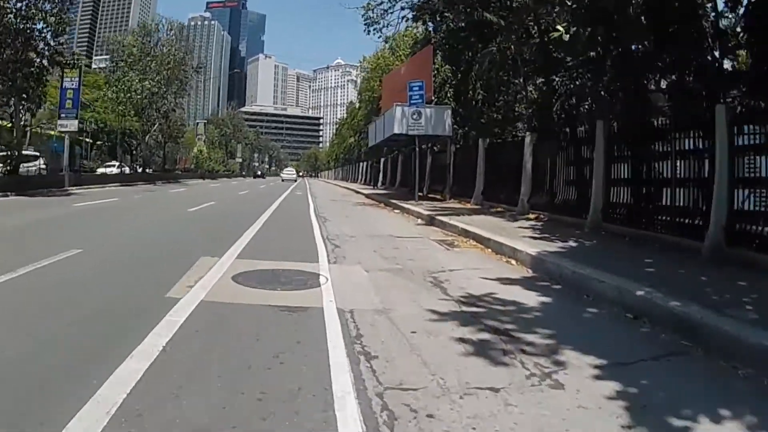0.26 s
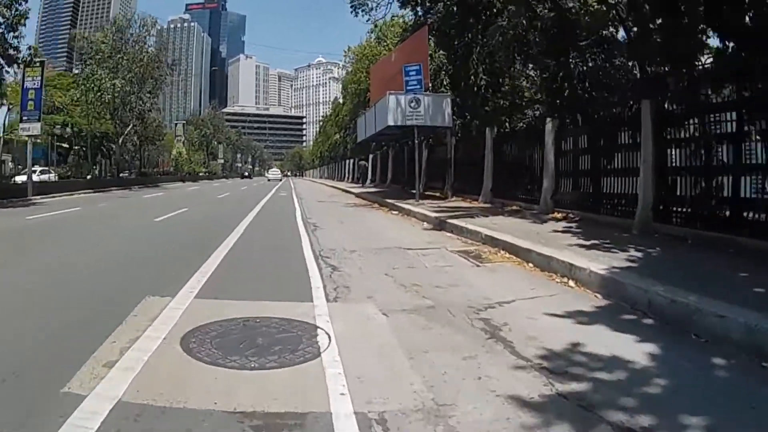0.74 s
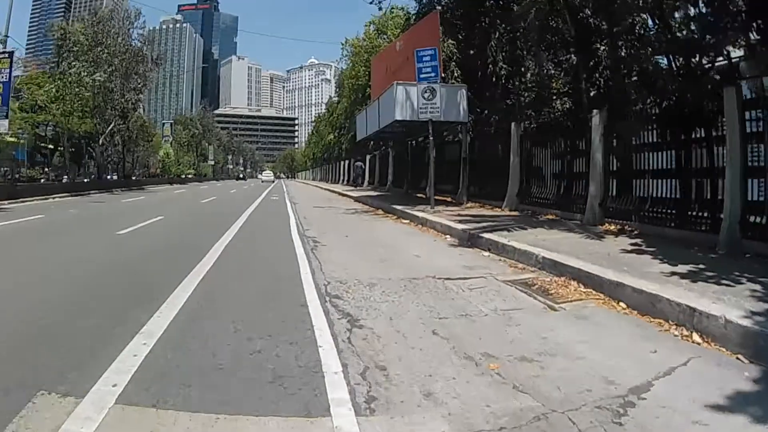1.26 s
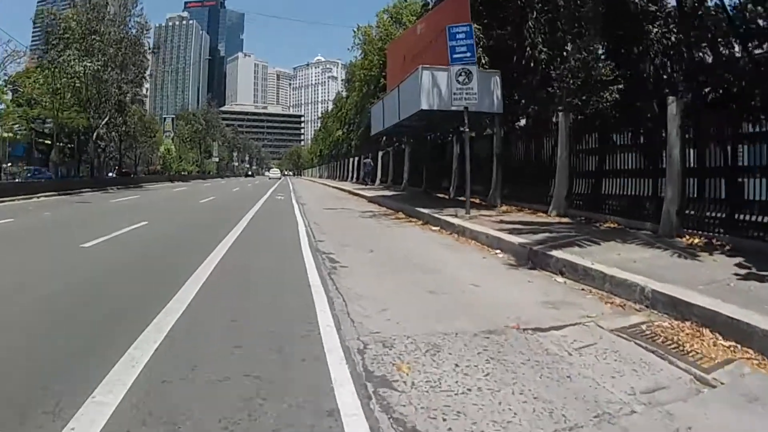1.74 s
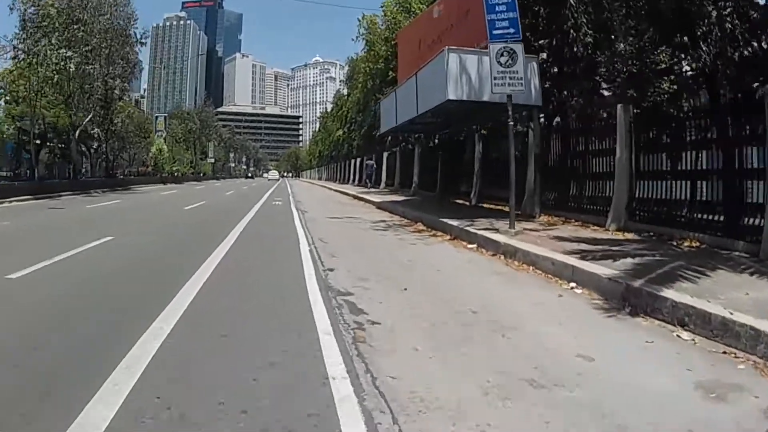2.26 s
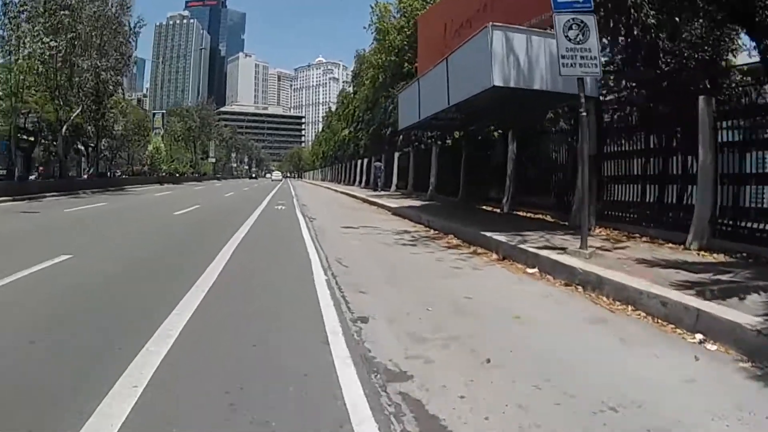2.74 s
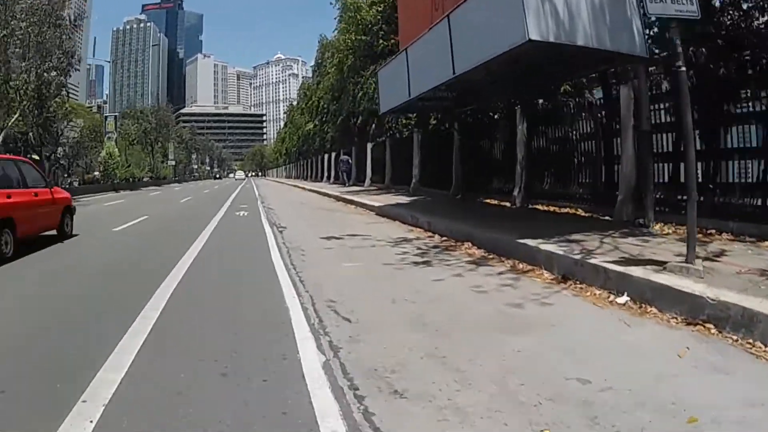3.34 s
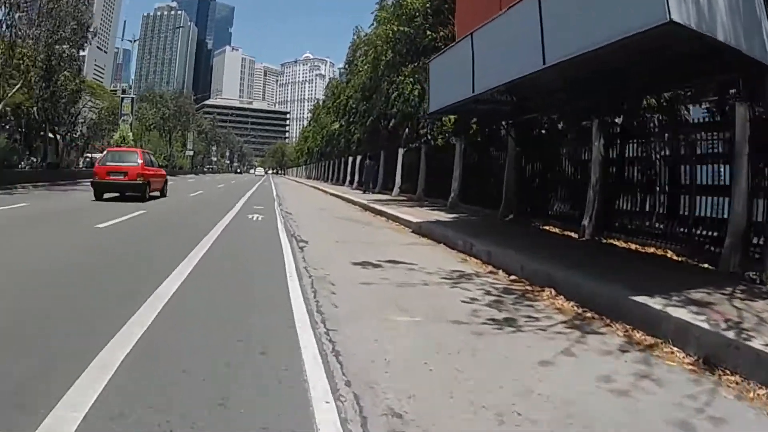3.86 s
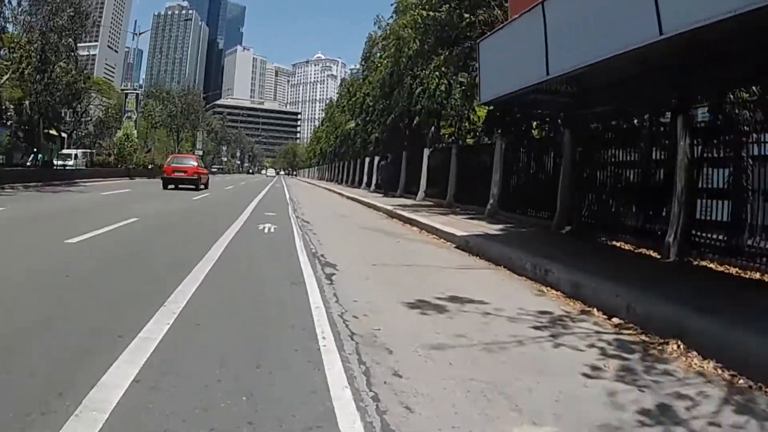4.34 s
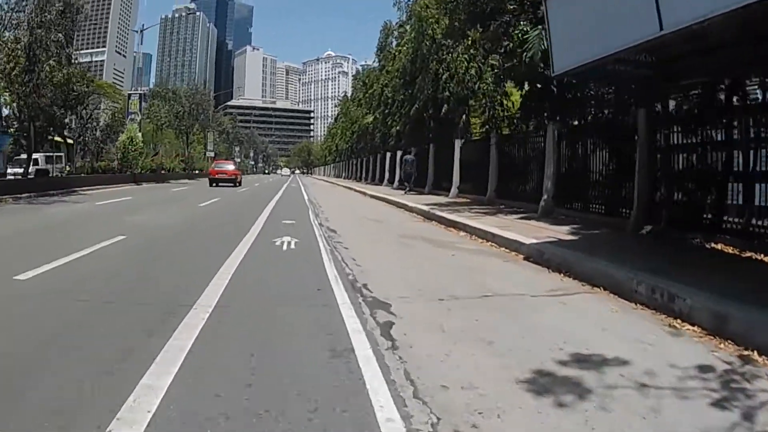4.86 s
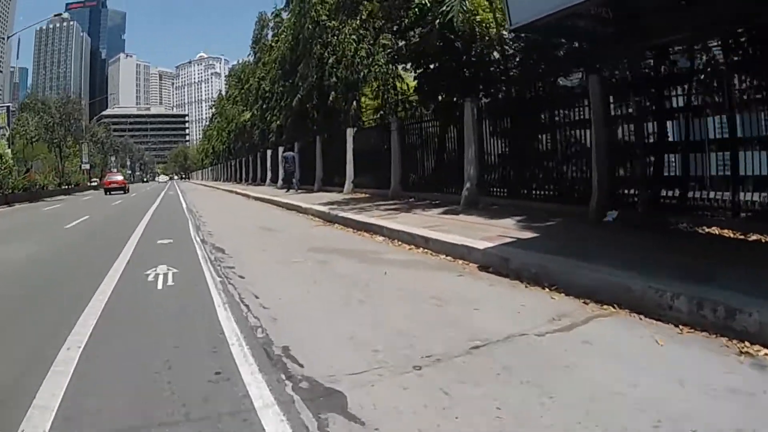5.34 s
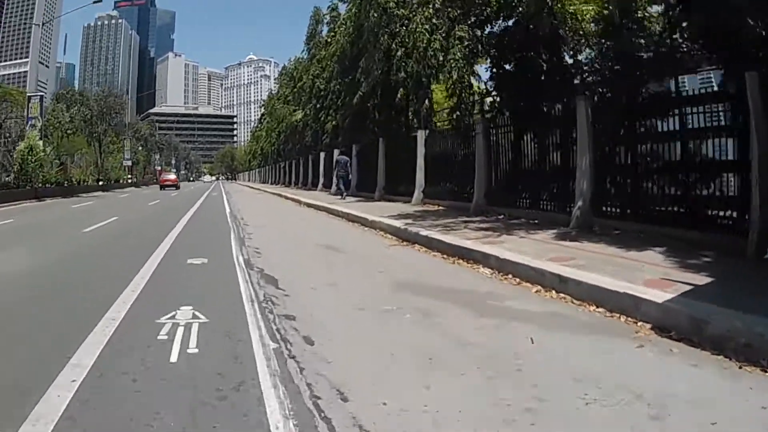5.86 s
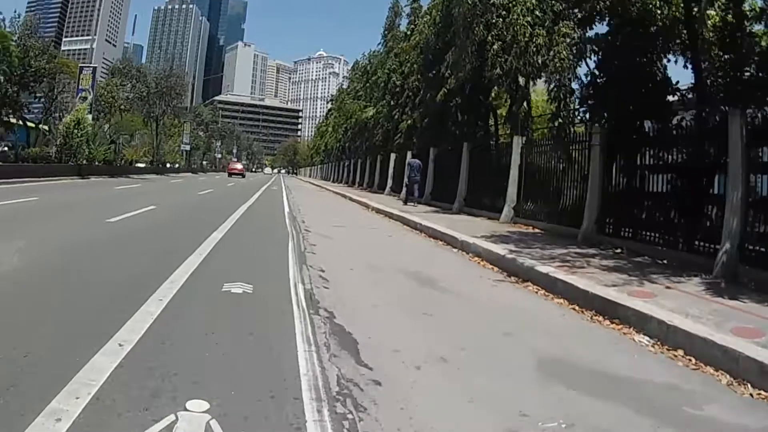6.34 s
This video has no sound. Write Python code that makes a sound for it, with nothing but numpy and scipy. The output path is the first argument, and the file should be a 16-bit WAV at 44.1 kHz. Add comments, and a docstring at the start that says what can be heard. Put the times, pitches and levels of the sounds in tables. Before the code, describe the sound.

A bicycle rolls along a rough city street, heard dry and close from a microphone in a plastic housing on the handlebar. Deep, lumpy wind sways and flutters throughout, above a low mount drone and gritty, hollow tyre roar. The road noise is strong for the first 1.3 s; a small knock at 1.3 and a cluster of dry ticks from 1.45 to 1.95 follow as it drops, quietest around 1.7-2.5. It builds again from 3, with light clacks and a faint car hiss swelling near 3.5. A very hard clack with a crack lands at 3.94, another with a bright ping at 4.17. A bump rattles in a quick run at 4.5-4.65. A modest clack comes at 5.4, sharp ones at 5.95 and 6.15, then the hardest, clipping double jolt at 6.4-6.5, rumble continuing to the end.

```python
"""A bicycle rolls along a city street, heard by a microphone in a plastic housing on the handlebar.
Noise and grit for the rough asphalt drive the resonances of mount and housing, over a deep, lumpy
sway and flutter of air. Knocks and snaps through the same resonances make clacks on small bumps and
rattles over two big ones, the hardest clipping. Dry ticks and cracks, sine pings and the faint
filtered hiss of an overtaking car complete it."""
import sys
import numpy as np
from scipy import signal
from scipy.fft import rfft, irfft
from scipy.io import wavfile
from scipy.ndimage import uniform_filter1d, minimum_filter1d

SR = 44100
rng = np.random.default_rng(int(sys.argv[2]) if len(sys.argv) > 2 else 0)


def dump(signal):
    """Clip the signal to [-1, 1] and save it as 16-bit WAV at the path in sys.argv[1]."""
    limited = np.clip(np.atleast_2d(signal).T, -1, 1)
    pcm = np.round(limited * 32767).astype(np.int16)
    wavfile.write(sys.argv[1], SR, pcm)


N = 291060
TIME, HZ = np.arange(N) / SR, np.fft.rfftfreq(N, 1 / SR)  # seconds, and the frequency of each bin
EDGE_HZ = 15800  # upper edge of the recorder's band

# Levels are in dB; some layers add a trim of their own.
# shaking by the road: start_s [s], mount_db [dB], housing_db [dB], treble_db [dB]
ROAD_SHAKING = [(0, -20.5, -33, -60.5), (0.33, -24, -34, -62.5), (0.851, -21, -32.5, -60.5),
                (1.271, -22.5, -35, -61.5), (1.37, -29.5, -42, -69), (1.52, -32.5, -41.5, -63),
                (1.7, -40.5, -52.5, -68.5), (2.25, -35, -44.5, -73), (2.95, -29.5, -40.5, -64),
                (3.148, -26, -37.5, -61), (3.701, -22.5, -33, -66.5), (4.05, -28.5, -39, -70.5),
                (4.45, -25.5, -35.5, -61.5), (4.799, -31, -42.5, -69), (5.2, -25.5, -37, -60.5),
                (5.88, -22.5, -33.5, -61), (6.2, -24.5, -40, -68), (6.6, -25.5, -37, -59)]
# tone of tyre on asphalt: frequency_hz [Hz], level_db [dB]
ROAD_TONE = [(500, 7), (1200, -1.5), (1500, -3), (1850, -5.5), (2150, -10.5), (2850, -17), (3300, -20),
             (4000, -18.5), (6000, -29), (12000, -45)]
# resonances of handlebar and mount: pitch_hz [Hz], width_hz [Hz], level_db [dB]
MOUNT_MODES = [(98, 58, -8.5), (133.7, 46.4, 1.5), (226.5, 54, -0.5), (295.9, 59, 0), (355.7, 34, -8),
               (383, 64.5, -11)]
# resonances of the plastic housing: pitch_hz [Hz], width_hz [Hz], level_db [dB]
HOUSING_MODES = [(490, 180, -16.5), (779, 113, -5), (892.6, 70, 0.5), (1021, 150, 0), (1155, 120, -0.5),
                 (1224, 55, 3), (1299.4, 128, 1), (1643, 160, -14), (1887, 190, -8), (2260, 460, -20),
                 (2520, 99, -15), (2870, 330, -16), (3194, 120, -14.5), (3376, 210, -16.5),
                 (3830, 740, -24), (4020, 100, -21.5), (4800, 390, -24.5), (6200, 450, -41),
                 (6900, 630, -46)]
# light parts ringing in short blips: pitch_hz [Hz], width_hz [Hz], level_db [dB]
BLIP_MODES = [(1838, 92, 0.5), (2834, 210, -17.5), (3660, 220, -29.5)]
# how loudly those light parts ring: start_s [s], level_db [dB]
BLIP_LEVEL = [(0, -50), (0.2, -49.5), (0.5, -47), (0.9, -43.5), (1.25, -50), (1.7, -61), (2.1, -62.5),
              (2.6, -49.5), (3.0, -53), (3.6, -41), (3.85, -51.5), (4.4, -52.5), (4.8, -60), (5.5, -50.5),
              (6.1, -56), (6.25, -57.5), (6.6, -54.5)]
# tone of the deep sway: frequency_hz [Hz], level_db [dB per Hz]
SWAY_TONE = [(8, 1.5), (17, -16.5), (24, 7), (31, 7), (40, -4), (52, -15), (80, -44.5)]
# tone of the air flutter above it: frequency_hz [Hz], level_db [dB per Hz]
FLUTTER_TONE = [(25, -29), (50, 5.5), (75, -1.5), (110, -7.5), (170, -20), (400, -35), (1500, -63.5),
                (6000, -75), (14000, -97.5)]
# slow swell of the deep buffeting: start_s [s], level_db [dB]
WIND_SWELL = [(0, -9), (0.6, -13.5), (1.0, -13), (1.8, -15.5), (2.25, -17.5), (2.6, -14.5), (2.9, -17.5),
              (3.3, -17), (3.7, -16.5), (4.2, -13), (4.6, -14.5), (5.0, -19), (5.3, -18.5), (5.6, -10.5),
              (6.2, -13.5), (6.6, -8.5)]
# heavy gusts standing out of it: middle_s [s], length_s [s], sway_db [dB], flutter_db [dB]
GUST_ARCHES = [(0.463, 0.12, -3, -40), (1.159, 0.065, -2, -37.5), (1.278, 0.11, 0, -19),
               (1.542, 0.3, -6, -16.5), (1.821, 0.071, -8, -24), (1.93, 0.16, -8.5, -26),
               (3.57, 0.093, -7.5, -23), (3.763, 0.089, -3.5, -26), (3.906, 0.12, -5.5, -18.5),
               (4.691, 0.15, -5, -24)]
# tone of the passing car: frequency_hz [Hz], level_db [dB per Hz]
CAR_TONE = [(100, -8), (500, -8), (1000, 7.5), (1600, -4.5), (2300, -15.5), (3400, -19), (4000, -24.5),
            (5000, -32.5), (16000, -65)]
# tone of the steady background hiss: frequency_hz [Hz], level_db [dB per Hz]
HISS_TONE = [(1000, -5.5), (5000, -3.5), (8000, -7.5), (12000, -19.5), (16000, -24.5)]
# clearest pings of the light parts: start_s [s], peak_db [dB], pitch_hz [Hz]
PING_HITS = [(0.062, -45, 2830), (0.233, -31.5, 1860), (0.696, -51.5, 2920), (2.006, -41.5, 1850),
             (2.088, -53, 2880), (3.485, -47.5, 2830), (3.6, -40, 2850), (3.666, -32, 1807),
             (4.05, -33, 1810), (4.17, -13, 1820), (4.277, -53, 2900), (4.364, -43.5, 2830),
             (6.062, -49, 2830)]
# dry ticks, most of them where the air buffets hardest: start_s [s], level_db [dB]
TICK_HITS = [(0.4775, -35), (0.8315, -28.5), (1.149, -33), (1.1735, -26.5), (1.3038, -14.5), (1.309, -33),
             (1.4585, -30), (1.4705, -19), (1.473, -32), (1.52, -33), (1.5367, -28), (1.5402, -18.5),
             (1.5599, -13.5), (1.579, -30), (1.5855, -24), (1.623, -25), (1.63, -34), (1.6403, -15),
             (1.651, -29), (1.695, -31.5), (1.711, -33), (1.731, -33.5), (1.816, -28.5), (1.826, -29),
             (1.9115, -22), (1.9215, -24), (1.9468, -20.5), (1.952, -25), (1.962, -28), (2.107, -36.5),
             (2.464, -37), (2.609, -28), (2.639, -33), (3.548, -32), (3.9302, -19), (4.671, -25),
             (4.6928, -16), (4.70, -28), (4.723, -29), (4.728, -40), (4.733, -31.5), (5.762, -20),
             (6.5365, -19.5), (6.541, -26), (6.546, -30)]
# tone of a dry tick: frequency_hz [Hz], level_db [dB]
TICK_TONE = [(60, 10.5), (300, 15), (1000, 6.5), (3000, -6), (7000, -14.5), (10000, -23.5), (12000, -33),
             (16000, -33)]
# thin cracks, most of them on hard blows, a few among the dry ticks: start_s [s], level_db [dB]
CRACK_HITS = [(1.2925, -22), (1.537, -25), (1.56, -36), (3.9383, -3.5), (4.546, -29.5), (4.5523, -30),
              (4.5715, -36), (4.5945, -38), (4.6712, -25), (5.9515, -7.5), (6.1487, -13), (6.3953, -11),
              (6.4365, -7), (6.4445, -27), (6.4487, -5), (6.472, -16.5)]
# tone of a thin crack: frequency_hz [Hz], level_db [dB]
CRACK_TONE = [(500, -6.5), (2000, 15), (5000, 2.5), (7000, 3), (10000, 4.5), (13000, -10.5), (16000, -14.5)]
# clacks of the housing: start_s [s], level_db [dB], treble_share_db [dB], pitch_hz [Hz]
CLACK_HITS = [(0.53, -29, -9, 1140), (0.917, -26, -12.5, 1110), (1.291, -19.5, -3, 1180),
              (1.4675, -19, -13, 1100), (1.471, -14, -16.5, 1000), (2.197, -22.5, -10.5, 1040),
              (2.703, -37, -7, 1104), (2.784, -22.5, -17.5, 1000), (3.076, -26, -18.5, 886),
              (3.167, -19, -13.5, 1010), (3.376, -31.5, -9, 1080), (3.5408, -17, -23, 930),
              (3.659, -14.5, -24.5, 1040), (3.876, -24, -11, 1070), (3.9351, 3.5, -6.5, 990),
              (3.942, -22, -17, 1150), (4.1705, -4, -5, 1237), (4.1761, -6.5, -24, 1196),
              (4.181, -15.5, -8, 1350), (4.852, -31, -25, 1060), (5.396, -14.5, -11.5, 1170),
              (5.455, -24, -9, 1250), (5.563, -27.5, -23.5, 970), (5.912, -21.5, -29.5, 1050),
              (5.9496, 1, -7.5, 1350), (5.954, -13.5, -12, 1250), (6.146, -4, -7, 1200),
              (6.153, -7.5, -17, 1200), (6.159, -11.5, -18, 1100)]
# tone of a light, hard contact: frequency_hz [Hz], level_db [dB]
CLACK_TONE = [(300, 11), (550, 4.5), (760, 3.5), (1100, 8), (1400, 4), (1850, 7), (2400, 1.5), (2900, 5.5),
              (3400, 3.5), (3950, 8), (4700, 0.5), (6300, -2)]
# single blows of the jolts: start_s [s], level_db [dB], treble_share_db [dB], thud_share_db [dB], pitch_hz [Hz]
JOLT_HITS = [(1.283, -21.5, -14, 6.5, 1120), (4.508, -10, -29, -4.5, 1160), (4.515, -7.5, -20, 1, 1150),
             (4.527, -18.5, -23, 6.5, 1170), (4.543, -4, -17, 1.5, 1130), (4.551, -3, -31, -0.5, 1060),
             (4.5695, 0.5, -19, -4, 1110), (4.576, -5, -23, -0.5, 940), (4.586, -13, -25, 4, 1100),
             (4.594, -13.5, -22, 4, 1080), (4.606, -16.5, -23, -6, 1150), (4.634, -21.5, -20, 6, 1190),
             (4.652, -22, -20, -4, 1040), (5.397, -29, -29, 12, 1090), (6.3942, 0.5, -19, -7, 1120),
             (6.399, -4.5, -14, 0.5, 1700), (6.404, -7.5, -14, 0, 1280), (6.42, -14, -16, 0, 1100),
             (6.436, 5.5, -15, -5, 1250), (6.441, 2, -28, -5, 1300), (6.449, -8.5, -8, 4, 1100),
             (6.457, -8, -8, 9, 900), (6.464, -11, -12, 4, 1200), (6.475, -20, -24, -7, 1200),
             (6.482, -17, -24, -4, 1150), (6.496, -15.5, -27, 4, 1100), (6.505, -19.5, -26, 11, 1100),
             (6.518, -22, -21, -3, 1200)]
# tone of a broad, heavy blow: frequency_hz [Hz], level_db [dB]
JOLT_TONE = [(100, -15.5), (200, -3), (290, 5.5), (400, 1), (620, 14.5), (850, 0.5), (1250, 1), (1550, 7),
             (1850, 5.5), (2300, 3.5), (3200, -13), (4200, -10.5), (4900, -15), (8000, -11)]


def gain_of(db):
    """Decibels to amplitude."""
    return 10 ** (np.asarray(db) / 20)


def evened(x):
    """Scales to rms 1."""
    return x / np.sqrt(np.mean(x ** 2) + 1e-20)


def peaked(x):
    """Scales to peak 1."""
    return x / (abs(x).max() + 1e-12)


def noise():
    """White noise over the whole scene."""
    return rng.standard_normal(N)


def add(mix, start_s, sound):
    """Mixes a sound in at its start time."""
    part = mix[max(round(start_s * SR), 0):][:len(sound)]
    part += sound[:len(part)]


def over_time(points):
    """Level in dB at every moment, from a few (s, dB) points."""
    return np.interp(TIME, *np.transpose(points))


def below(split_hz, steepness):
    """Gain at every frequency of a smooth low-pass."""
    return 1 / (1 + (HZ / split_hz) ** steepness)


def colour(points):
    """Gain at every frequency from a few (Hz, dB) points."""
    hz, db = np.transpose(points)
    return gain_of(np.interp(np.log(HZ + 1), np.log(hz), db))


def body(modes):
    """Gain at every frequency of a set of steep-sided resonances, summed as power."""
    power = 0
    for hz, width_hz, db in modes:
        power = power + (gain_of(db) / (1 + (2 * (HZ - hz) / width_hz) ** 2)) ** 2
    return np.sqrt(power)


def shaped(x, gain):
    """Filters a whole signal; rms 1."""
    return evened(irfft(rfft(x) * gain, N))


def ring(gain, size=4096):
    """Causal impulse response with the given gain: the energy comes as early as it can."""
    log_gain = np.log(np.maximum(gain / gain.max(), 1e-5))
    circle = np.concatenate([log_gain, log_gain[-2:0:-1]])
    # minimum phase follows from the Hilbert transform of the log gain
    return np.fft.ifft(np.exp(np.conj(signal.hilbert(circle)))).real[:size]


def wander(rate_hz):
    """Slow random drift of rms 1."""
    return shaped(noise(), below(rate_hz, 4))


def stones(per_s, spread_db):
    """Random kicks of uneven size and either sign, from the grain of the asphalt."""
    size = gain_of(spread_db * np.minimum(rng.exponential(1, N), 3))
    return (rng.random(N) < per_s / SR) * size * rng.choice([-1, 1], N)


def blipping(per_s=87, spread_db=3.0):
    """Stones kick light parts, each ringing in short blips at its own resonance."""
    blips = np.zeros(N)
    for hz, width_hz, db in BLIP_MODES:
        part_ring = ring(body([(hz, width_hz, 0)]))
        blips += gain_of(db) * evened(signal.fftconvolve(stones(per_s, spread_db), part_ring)[:N])
    return gain_of(over_time(BLIP_LEVEL)) * blips


def rolling(mount_db=1.5, housing_db=-0.5, treble_db=-2.0, patchy_db=1.91, grit_db=-11,
            treble_grit_db=-3, split_hz=2150):
    """Asphalt shakes mount and housing; stones stand out as grit, most in the treble, and as blips."""
    start_s, *columns = np.transpose(ROAD_SHAKING)
    low_db, mid_db, high_db = (np.interp(TIME, start_s, column) for column in columns)
    texture_db = patchy_db * wander(rate_hz=37)
    shell, lower = body(HOUSING_MODES) * colour(ROAD_TONE), below(split_hz, 20)
    grit = evened(stones(per_s=170, spread_db=-4.5))
    drone = shaped(noise(), body(MOUNT_MODES))
    roar = shaped(noise() + gain_of(grit_db) * grit, shell * lower)
    fizz = shaped(noise() + gain_of(treble_grit_db) * grit, shell * (1 - lower))
    shaking = gain_of(low_db + mount_db) * drone
    shaking += gain_of(mid_db + housing_db) * roar
    shaking += gain_of(high_db + treble_db) * fizz
    return gain_of(texture_db) * (shaking + blipping())


def gusting():
    """Every gust rises and falls in one smooth arch: amplitudes of sway and flutter."""
    arches = np.zeros((2, N))
    for middle_s, length_s, *levels_db in GUST_ARCHES:
        arch = np.cos(np.pi * np.clip((TIME - middle_s) / length_s, -.5, .5))
        arches += gain_of(levels_db)[:, None] * arch
    return arches


def buffeting(sway_db=1, air_db=-3, lumps_db=2, air_lumps_db=4.0):
    """A lumpy sway strongest near 24 to 31 Hz; the flutter above it grows with the shaking and in gusts."""
    start_s, shaking_db, *_ = np.transpose(ROAD_SHAKING)
    gust, flutter = gusting()
    swing = signal.hilbert(shaped(noise(), colour(SWAY_TONE)))
    # the swings keep a fairly even height, so that wind and gusts set their size
    even_swing = swing.real / (abs(swing) + 0.015)
    sway = shaped(even_swing, below(55, 6))
    air = shaped(noise(), colour(FLUTTER_TONE))
    wind = gain_of(over_time(WIND_SWELL) + sway_db + lumps_db * wander(rate_hz=3.3))
    air_lumps = air_lumps_db * wander(rate_hz=0.21)
    shaking = gain_of(np.interp(TIME, start_s, shaking_db) + air_db + air_lumps)
    return np.hypot(wind, gust) * sway + np.hypot(shaking, flutter) * air


def car(level_db=-44, nearest_s=3.5, passing_s=0.6, falloff=1.8):
    """Tyre hiss of an overtaking car, swelling as it draws level and falling off quickly with distance."""
    distance = np.hypot(1, (TIME - nearest_s) / passing_s)  # 1 when level with the bicycle
    return gain_of(level_db) / distance ** falloff * shaped(noise(), colour(CAR_TONE))


def hissing(level_db=-90):
    """Very faint, steady hiss: noise filtered to one fixed tone."""
    return gain_of(level_db) * shaped(noise(), colour(HISS_TONE))


def pings(rise_s=0.0027):
    """A larger stone sets one light part ringing: a sine that swells briefly and dies."""
    out, t = np.zeros(N), np.arange(3000) / SR
    for start_s, db, hz in PING_HITS:
        swell = t / rise_s * np.exp(1 - t / rise_s)
        add(out, start_s, gain_of(db) * swell * np.sin(2 * np.pi * hz * t))
    return out


def chatter(share_db, decay_s, swell=0.57, size=6000):
    """One firm contact, trailed by a burst of tiny uneven ones that swells and dies; energy about 1."""
    u = np.arange(size) / SR / decay_s
    # cubed noise makes the tiny contacts uneven
    trail = rng.standard_normal(size) ** 3 * u ** swell * np.exp(-u)
    share = gain_of(share_db)
    contacts = signal.unit_impulse(size) + share * trail / np.linalg.norm(trail)
    return contacts / np.hypot(1, share)


def struck(response, share_db, decay_s):
    """Sets a response ringing with one contact and its trail of chatter."""
    return signal.fftconvolve(chatter(share_db, decay_s), response)


def ticks(hits, tone, trail_db, trail_s):
    """Dry broadband ticks with no resonances, each trailed by a faint fizz."""
    out, tick = np.zeros(N), peaked(ring(colour(tone)))
    for start_s, db in hits:
        add(out, start_s, gain_of(db) * struck(tick, trail_db, trail_s))
    return out


def housing_rings(blow, direct_db, split_hz=2300):
    """Hollow lower and bright upper ring of the housing; a little of the blow passes straight through."""
    lower = below(split_hz, 12)
    gain = (body(HOUSING_MODES) + gain_of(direct_db) * below(11000, 4)) * blow
    return ring(gain * lower), ring(gain * (1 - lower))


def pitched(x, hz, q):
    """The place of a blow favours the resonances around one pitch; peak 1."""
    return peaked(signal.lfilter(*signal.iirpeak(hz, q, SR), x))


def clacks(treble_db=1, contact_db=-5, contact_s=0.00069, buzz_db=0, buzz_s=0.0016, lag_s=0.001):
    """Play in the housing closes with a hard snap; the hollow shell answers later, and both buzz to rest."""
    out = np.zeros(N)
    hollow, bright = housing_rings(colour(CLACK_TONE), direct_db=-77.5)
    for start_s, db, share_db, hz in CLACK_HITS:
        knock = struck(pitched(hollow, hz, q=0.82), contact_db, contact_s)
        snap = struck(peaked(bright), buzz_db, buzz_s)
        add(out, start_s, gain_of(db + share_db + treble_db) * snap)
        add(out, start_s + lag_s, gain_of(db) * knock)
    return out


def jolts(level_db=1, thud_db=-1, rattle_db=2, rattle_s=0.0048, buzz_db=5, buzz_s=0.0062,
          shudder_db=-1, shudder_s=0.0084):
    """A wheel hits a bump: the housing clatters in blows, quick runs at the big ones, and the mount thuds."""
    out, blow = np.zeros(N), colour(JOLT_TONE)
    hollow, bright = housing_rings(blow, direct_db=-62.0)
    mount = ring(body(MOUNT_MODES) * blow)
    for start_s, db, share_db, low_db, hz in JOLT_HITS:
        rattle = struck(pitched(hollow, hz, q=0.94), rattle_db, rattle_s)
        snap = gain_of(share_db) * struck(peaked(bright), buzz_db, buzz_s)
        thud = gain_of(low_db + thud_db) * struck(peaked(mount), shudder_db, shudder_s)
        add(out, start_s, gain_of(db + level_db) * (rattle + snap + thud))
    return out


def scene():
    """Everything reaches the one microphone on the handlebar, with no room around it."""
    ride = rolling() + buffeting()
    background = car() + hissing()
    ticking = ticks(TICK_HITS, TICK_TONE, trail_db=-6.5, trail_s=0.0077)
    cracking = ticks(CRACK_HITS, CRACK_TONE, trail_db=-13, trail_s=0.0088)
    return (ride + background + pings() + ticking + clacks() + jolts() + cracking)[None]


def record(dry, ceiling=1.0, split_hz=75, least_room=0.22):
    """A limiter turns the deep sway down to leave room for the faster sound; the hardest blows still clip."""
    sway = irfft(rfft(dry[0]) * below(split_hz, 4), N)
    fast = dry[0] - sway
    room = np.maximum(ceiling - abs(fast), least_room)
    # hold the lowest gain around each peak (sizes in samples), then smooth it twice
    allowed = minimum_filter1d(np.minimum(1, room / (abs(sway) + 1e-9)), size=900)
    eased = uniform_filter1d(uniform_filter1d(allowed, size=450), size=450)
    clipped = np.clip(fast + sway * eased, -1, 1)
    band_edge = signal.firwin(255, EDGE_HZ, window=("kaiser", 9), fs=SR)
    return signal.oaconvolve(clipped, band_edge, "same")[None]


dry = scene()
out = record(dry)
dump(out)
```